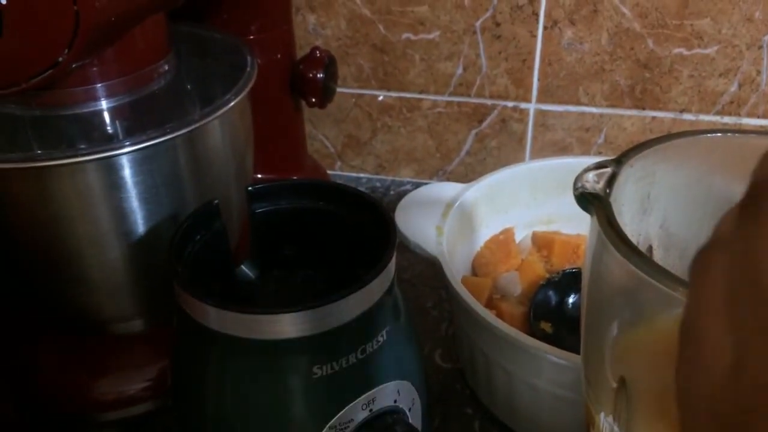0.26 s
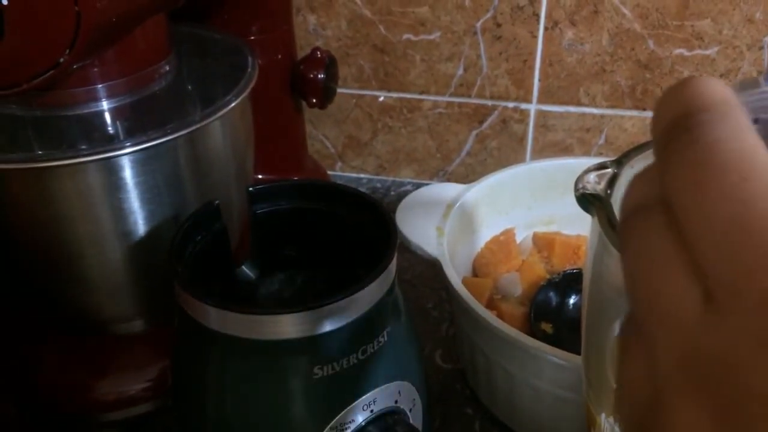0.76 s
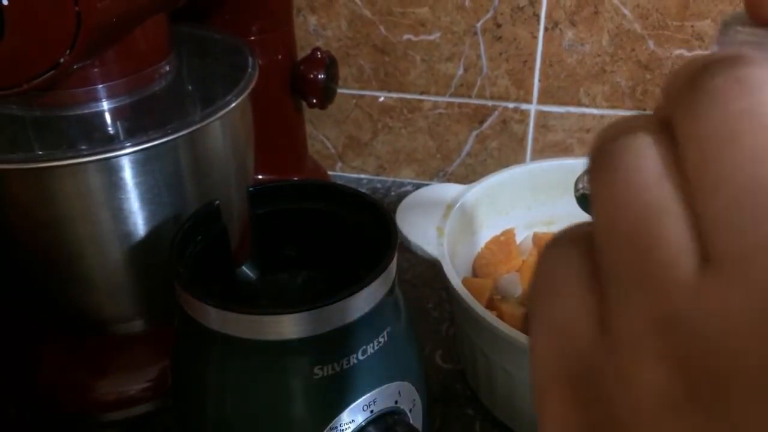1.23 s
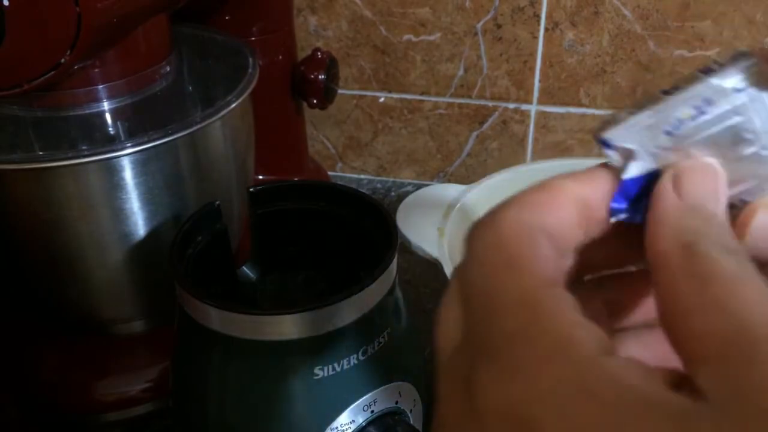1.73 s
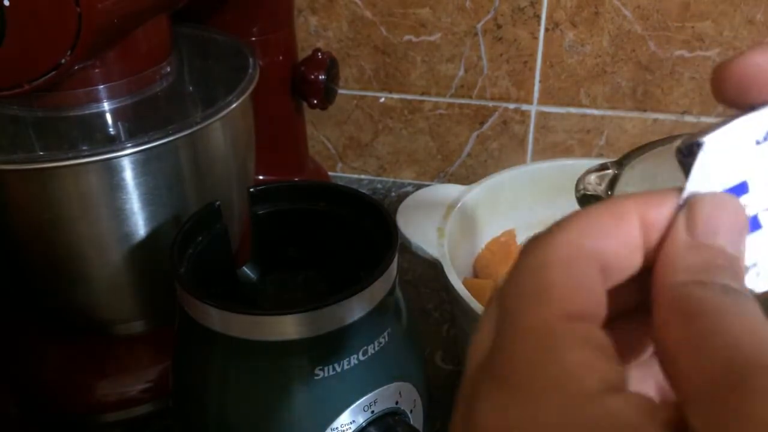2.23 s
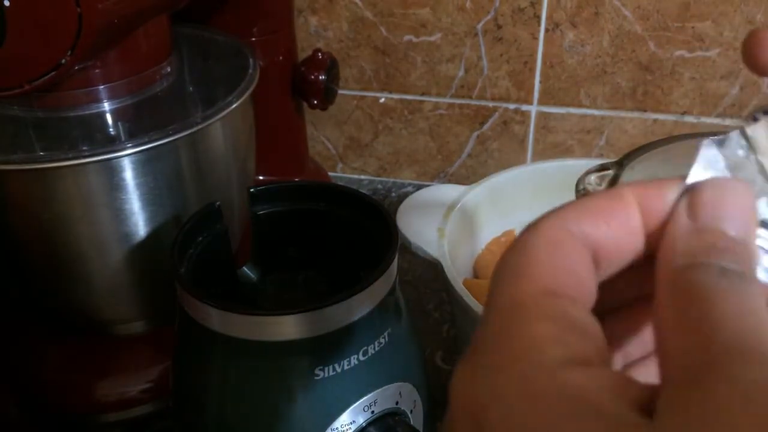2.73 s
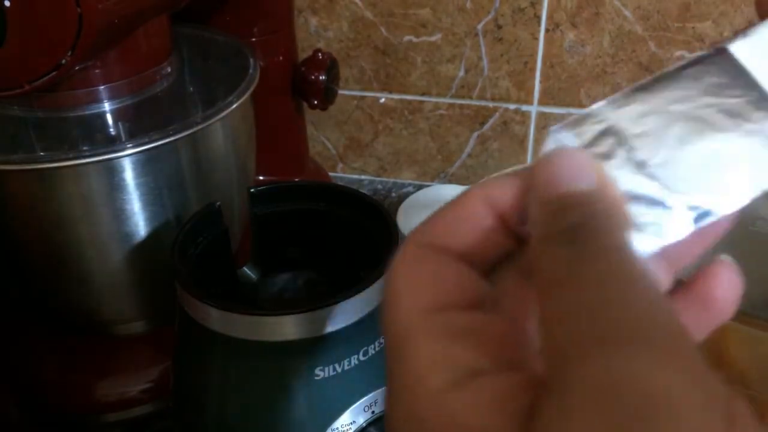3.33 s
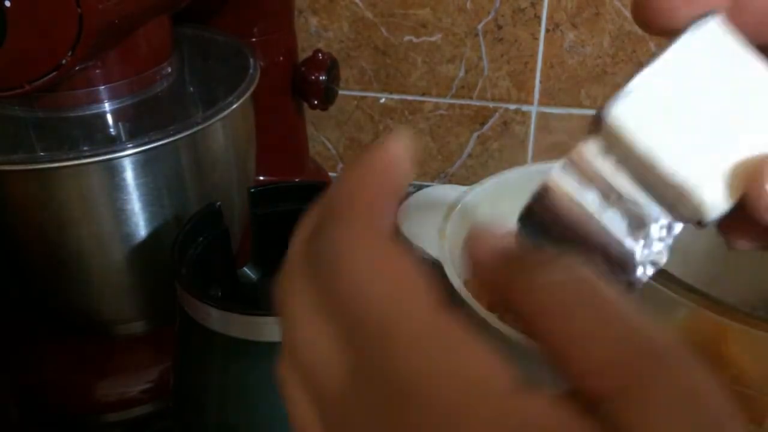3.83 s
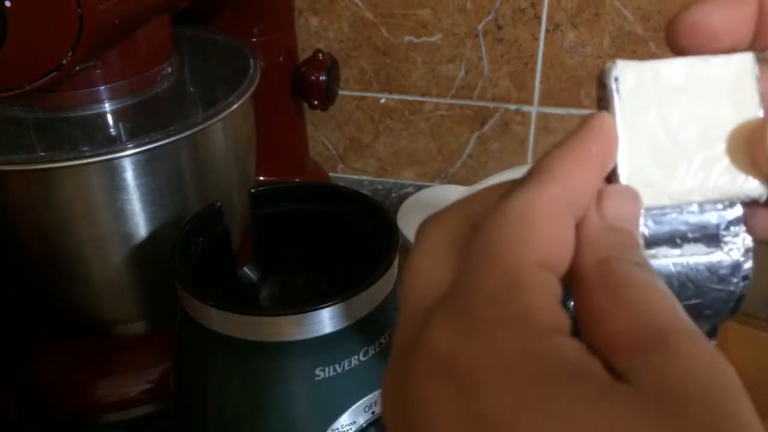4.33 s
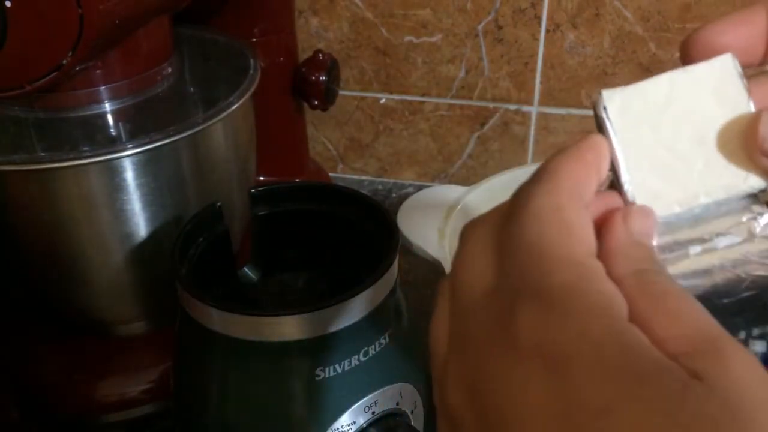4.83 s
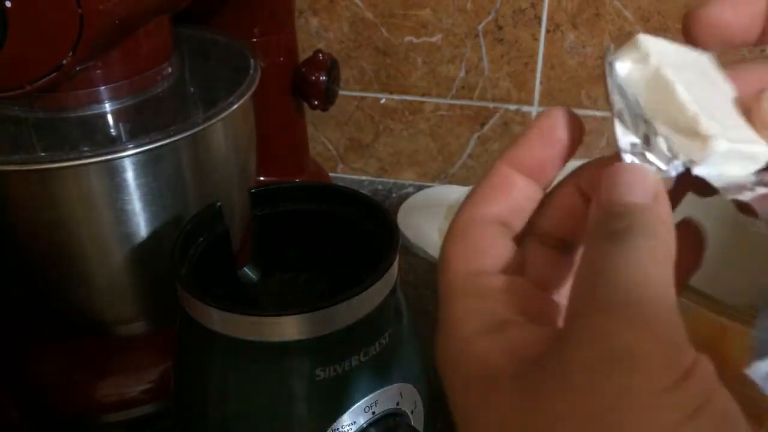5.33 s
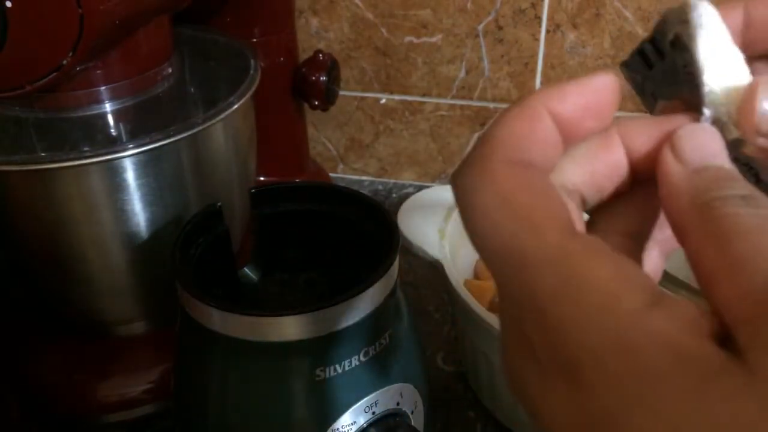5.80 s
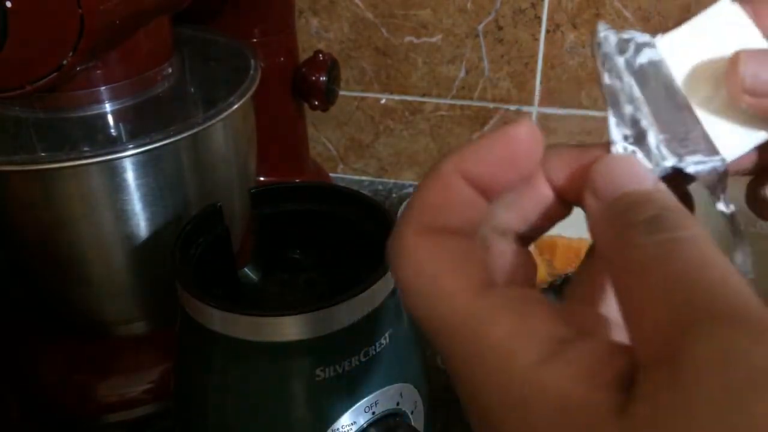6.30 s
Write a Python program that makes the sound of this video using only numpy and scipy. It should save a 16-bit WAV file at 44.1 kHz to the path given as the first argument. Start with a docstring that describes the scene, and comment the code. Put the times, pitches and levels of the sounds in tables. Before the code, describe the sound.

Close to the microphone, hands unwrap a small foil-covered block in a tiled kitchen. Faint isolated ticks come first, then a sudden loud, bright rip and dense crackling with a hollow, falling rustle as the sheet peels off. It calms to sparse snaps, a brief fingertip squeak and light crinkles of folding. Soft room noise continues beneath, with a low rumble swelling near the end.

```python
"""Hands unwrap a small foil-covered block over a kitchen counter, close to the microphone.
The foil ticks as it is gripped, then rips open and peels off with a falling hollow rustle.
A fingertip squeaks on it in short rubs, and the sheet is folded back.
Throughout, creases buckle with snaps that shake the sheet, small buckles crackle and dull thuds jolt the block.
Tiled walls answer with a short tail, over steady room noise and a low rumble that swells quickly near the end."""
import sys
import numpy as np
from scipy import signal
from scipy.fft import rfft, irfft, next_fast_len
from scipy.io import wavfile
from scipy.ndimage import map_coordinates

SR = 44100
rng = np.random.default_rng(int(sys.argv[2]) if len(sys.argv) > 2 else 0)


def wav_record(signal):
    """Record a signal, one row per channel, as 16-bit PCM in the file named by sys.argv[1]."""
    frames = np.transpose(np.atleast_2d(signal))
    bounded = np.clip(frames, -1, 1)
    # unit amplitude maps onto the largest positive 16-bit level
    quanta = np.round(bounded * 32767).astype(np.int16)
    wavfile.write(sys.argv[1], SR, quanta)


N = 289296


def amp(db):
    """Decibels to gain."""
    return 10 ** (np.asarray(db) / 20)


def unit(x):
    """Scale to rms 1."""
    return x / np.sqrt(np.mean(x ** 2) + 1e-20)


def along(points, hz):
    """Read a curve of (Hz, value) points on a log frequency axis."""
    f, v = np.transpose(points)
    return np.interp(np.log(hz + 1), np.log(f + 1), v)


def filtered(x, response):
    """Filter x with a response given as a function of frequency in Hz."""
    size = next_fast_len(2 * len(x))
    hz = np.fft.rfftfreq(size, 1 / SR)
    return irfft(rfft(x, size) * response(hz), size)[:len(x)]


def coloured(x, spectrum):
    """Shape x with the given spectrum in dB and scale it to rms 1."""
    return unit(filtered(x, lambda hz: amp(along(spectrum, hz))))


def resonance(hz, centre_hz, q):
    """Causal response of one damped mode, with gain 1 at its centre."""
    damping = 1j * hz * centre_hz / q
    return damping / (centre_hz ** 2 - hz ** 2 + damping)


def envelope(start_s, length_s, attack_s, release_db_per_s):
    """Rise linearly, hold until the length is over, then die away at a steady rate in dB."""
    t = np.arange(N) / SR - start_s
    rise = np.clip(t / attack_s, 0, 1)
    return rise * amp(-release_db_per_s * np.maximum(t - length_s, 0))


def snaps(snap_q=1.43, ring_q=0.41, ring_t60=0.038, ring_pitch=0.75, treble_hz=13000,
          stutter_db=1.0, stutter_per_s=700):
    """Each crease flips in one sharp pulse, then bending waves scatter through the sheet in uneven spurts."""
    # The clearest creases buckling. Each row: start in seconds, level of the pulse in dB with its energy
    # counted over one millisecond, pitch in Hz, ring of the sheet against the pulse in dB.
    creases = [(0.8316, -34.5, 8850, -9), (0.888, -56, 1700, 6.5), (1.017, -59, 3670, 7.5),
               (1.4237, -49, 5440, 7.5), (1.6746, -47, 1780, -3), (1.9445, -42, 7800, -0.5),
               (1.9647, -44.5, 8100, 0.5), (2.124, -49, 3570, 7.5), (2.255, -52.5, 6930, 3.5),
               (2.4327, -48.5, 7100, -1), (2.6897, -20.5, 4000, 6), (2.693, -21, 3250, -2),
               (2.7026, -19, 1860, -5), (2.7066, -19.5, 4700, -14), (2.7132, -20, 2570, -33),
               (2.7165, -13.5, 2450, -18), (2.725, -25, 2070, 4.5), (2.7352, -24.5, 4500, -14),
               (2.7591, -23, 3930, -17), (2.7882, -25.5, 1480, -19), (2.793, -34.5, 1580, -2),
               (2.7973, -31, 5300, -16), (2.931, -40.5, 5300, -9), (2.9416, -41, 1780, -0.5),
               (2.9573, -37.5, 1170, -9), (3.011, -36, 6340, 1), (3.0599, -36.5, 3600, -2.5),
               (3.0995, -26.5, 6070, -6), (3.1048, -30.5, 3000, 2), (3.1609, -33.5, 5600, -10),
               (3.1877, -39.5, 1700, 6.5), (3.2083, -32.5, 5940, -6), (3.2358, -31, 5840, -5),
               (3.2497, -20.5, 5540, -7.5), (3.2875, -26.5, 1990, 3.5), (3.2886, -21.5, 5800, -7),
               (3.2996, -28.5, 7140, 5), (3.321, -40, 5270, -9), (3.4349, -33, 5140, -9.5),
               (3.514, -26, 2670, -9), (3.5645, -33, 2530, 2), (3.586, -25.5, 2180, -5),
               (3.6067, -28, 2230, -2), (3.614, -30, 2480, -4), (3.6335, -37, 5270, -7),
               (3.679, -33.5, 2660, 4), (3.698, -28, 3980, 3.5), (3.8228, -32.5, 5560, -2),
               (3.8343, -24, 4300, 3), (3.8393, -23.5, 1760, 0.5), (3.8495, -24.5, 4370, -2),
               (3.866, -40, 2700, 8), (3.8786, -34, 3970, 0.5), (3.916, -48, 3600, 0),
               (3.9272, -31.5, 2770, 2.5), (3.9497, -35.5, 4900, 6.5), (3.9627, -41, 4060, -14),
               (4.019, -44, 3300, 5), (4.0327, -46, 4300, 5.5), (4.0425, -40, 3160, 5.5),
               (4.0684, -37.5, 5430, -1), (4.437, -51.5, 2490, -5), (4.7114, -43.5, 1400, -11),
               (4.9154, -51, 2050, 6.5), (5.1084, -45.5, 3330, -3), (5.2913, -39, 3540, -17),
               (5.2995, -46.5, 2980, 4), (5.3412, -48.5, 5500, -3), (5.4037, -45.5, 4340, -7),
               (5.4158, -43, 9000, -5), (5.4527, -42, 1980, 0), (5.527, -40, 6460, -4),
               (5.6103, -49, 4160, 4.5), (5.695, -53.5, 4560, 4.5), (5.947, -45.5, 7060, -0.5),
               (5.973, -50.5, 3320, 13), (5.9937, -35, 5300, -2.5), (6.0484, -40, 5450, 2.5),
               (6.0676, -36.5, 2350, -2), (6.094, -41, 4500, 2), (6.1035, -40, 7500, 7),
               (6.164, -33, 9300, -1), (6.1909, -37.5, 2070, -1), (6.204, -44.5, 4370, 3),
               (6.254, -52, 2100, 8.5), (6.4013, -49, 3500, 4.5), (6.507, -41.5, 4640, -10),
               (6.517, -48.5, 2440, 7.5)]
    out = np.zeros(N + SR)
    t = np.arange(SR // 16) / SR
    millisecond = SR / 1000  # in samples
    fade = amp(-60 * t / ring_t60) * (1 - np.exp(-t / 0.00042))
    impulse = 1.0 * (t == 0)
    for start_s, db, pitch_hz, sheet_db in creases:
        patch = facet(pitch_hz)
        pulse = filtered(radiated(impulse, pitch_hz, snap_q), patch)
        wander = map_coordinates(rng.standard_normal(len(t)), [t * stutter_per_s], order=1)
        scatter = rng.standard_normal(len(t)) * fade * amp(stutter_db * wander)
        ring = filtered(radiated(scatter, pitch_hz * ring_pitch, ring_q), patch)
        snap = unit(pulse) + amp(sheet_db) * unit(ring)
        first = round(start_s * SR)
        out[first:first + len(t)] += amp(db) * snap * np.sqrt(millisecond / len(t))
    soft_treble = lambda hz: 1 / np.sqrt(1 + (hz / treble_hz) ** 6)
    return filtered(out[:N], soft_treble)


def radiated(x, pitch_hz, q, low_hz=750, reach=2.16, crack=0.013):
    """A foil facet rings around its pitch, with little bass; a thin crack reaches into the high treble."""
    body = lambda hz: resonance(hz, pitch_hz, q) / (1 + 1j * hz / (reach * pitch_hz))
    # small, high-pitched facets crack more sharply
    edge = lambda hz: crack * pitch_hz / 4000 * 1j * hz / (pitch_hz + 1j * hz)
    bass_cut = lambda hz: 1j * hz / (low_hz + 1j * hz)
    return filtered(x, lambda hz: (body(hz) - edge(hz)) * bass_cut(hz))


def facet(pitch_hz, mode_q=7, mode_gain=1.13, spread=0.56, bend=0.13):
    """A new patch of foil: one mode on its pitch, three scattered ones, and bending waves, treble first."""
    modes_hz = pitch_hz * np.exp(spread * rng.uniform(-1, 1, size=3))
    signs = rng.choice([-1, 1], size=3)
    path = bend * rng.uniform(0.54, 1)  # a longer path spreads the treble and the lows further apart
    scattered = lambda hz: sum(sign * resonance(hz, centre, mode_q) for sign, centre in zip(signs, modes_hz))
    modes = lambda hz: 1 + mode_gain * (resonance(hz, pitch_hz, mode_q) + scattered(hz))
    return lambda hz: modes(hz) * np.exp(-1j * path * np.sqrt(hz))


def crackle(split_hz=3500, ring_t60=0.027, ring_db=2.5, busy_db=-38, busy_rate=1300, calm_rate=110):
    """Small buckles ring in the sheet; more strain gives more of them, and taut foil sounds brighter."""
    # The stretched sheet sings at a few resonances. Each row: centre in Hz, level in dB.
    sheet_modes = [(1950, 8.5), (2540, 4), (5790, -4)]
    sheet_q = 29
    # Overall colour of the crackling foil. Each row: frequency in Hz, relative level in dB per Hz.
    foil_spectrum = [(150, -23), (300, -20), (480, -1), (650, -7.5), (950, 3), (1900, -2.5), (2800, -5),
                     (4000, -6.5), (5900, -5), (10000, -15.5), (16000, -33)]
    db, bright_db = strain()
    rate = calm_rate + busy_rate * amp(db - busy_db) ** .7  # buckles per second
    buckles = grains(rate, spread_db=6.0)
    modes = lambda hz: 1 + sum(amp(level) * resonance(hz, centre, sheet_q) for centre, level in sheet_modes)
    ringing = buckles + amp(ring_db) * flexing(buckles, ring_t60)
    sheet = coloured(filtered(ringing, modes), foil_spectrum)
    body = filtered(sheet, lambda hz: 1 / (1 + (hz / split_hz) ** 4))
    treble = sheet - body
    # brightness tilts the sound: half of it lifts the treble, half lowers the body
    return amp(db) * (body * amp(-bright_db / 2) + treble * amp(bright_db / 2))


def strain():
    """Crackle level and brightness in dB: strokes add in power, and the strongest weighs most on the colour."""
    # Finger strokes that strain the foil: finding a grip, the rip, picking at the flap, peeling,
    # the block coming free, folding back.
    # Each row: start in seconds, length in seconds, level in dB before the tilt, brightness in dB.
    strokes = [(0.858, 0.044, -70.5, 30), (0.88, 0.37, -75, -6), (1.447, 0.085, -70, 24.5),
               (1.646, 0.024, -59, 11.5), (1.824, 0.015, -64.5, 17.5), (2.091, 0.022, -60, -3),
               (2.684, 0.019, -38, 23), (2.947, 0.32, -62, -9), (3.196, 0.037, -40, 5.5),
               (3.24, 0.018, -33.5, 15), (3.28, 0.033, -32.5, 7.5), (3.335, 0.041, -45.5, -18),
               (3.453, 0.11, -38, 1), (3.827, 0.016, -40.5, 0), (3.876, 0.23, -59, 2),
               (5.903, 0.44, -64.5, 2), (6.066, 0.086, -52.5, 9.5), (6.181, 0.02, -50, 3)]
    attack_share = 0.31  # long strokes swell slowly: the rise takes this share of the length
    release_db_per_s = 286
    power = np.array([(amp(db) * envelope(start_s, length_s, attack_share * length_s, release_db_per_s)) ** 2
                      for start_s, length_s, db, _ in strokes])
    total = power.sum(axis=0) + 1e-12
    brightness = np.array(strokes)[:, -1]
    return 10 * np.log10(total), brightness @ power / total


def grains(rate, spread_db):
    """Tiny buckles at random moments, of very uneven size; rate is per second, one value per sample."""
    size = amp(spread_db * np.clip(rng.standard_normal(N), -2, 2))
    happens = rng.random(N) < rate / SR
    sign = rng.choice([-1, 1], N)
    return unit(happens * sign * size / np.sqrt(rate))  # busier stretches get smaller buckles


def flexing(x, ring_t60, hold=.02, patch_hz=2400):
    """The sheet's ring; every hold seconds another patch takes it up, with resonances of its own."""
    step = round(hold * SR)
    t = np.arange(SR // 20) / SR
    out = np.zeros(N + SR)
    fade = amp(-60 * t / ring_t60)
    for start in range(0, N, step):
        patch = unit(filtered(rng.standard_normal(len(t)) * fade, facet(patch_hz, mode_gain=0.3)))
        ring = signal.fftconvolve(x[start:start + step], patch)
        out[start:start + len(ring)] += ring
    return unit(out[:N])


def peel(width_hz=55, upper_ratio=2.9, upper_db=0):
    """The freed sheet drums as it comes unstuck; its two low modes fall as it grows and slackens."""
    gain, pitch_hz = slackening()
    phase = 2 * np.pi * np.cumsum(pitch_hz) / SR

    def shake(width):
        """Slow noise that blurs a mode over its width in Hz."""
        return unit(filtered(rng.standard_normal(N), lambda hz: 1 / (1 + (hz / width) ** 2)))

    def mode(ratio):
        """A noisy band gliding at a fixed ratio to the sheet's pitch."""
        width = width_hz * ratio
        return shake(width) * np.cos(ratio * phase) + shake(width) * np.sin(ratio * phase)

    return gain * unit(mode(0.94) + amp(upper_db) * mode(upper_ratio))


def slackening():
    """Gain and pitch of the freed sheet: each peel starts taut and sags until the pull ends."""
    # The sheet coming unstuck from the block. Each row: start in seconds, length in seconds, level in dB,
    # reference pitch at the start in Hz (the modes sound at ratios to it).
    pulls = [(3.245, 0.06, -52.5, 460), (3.366, 0.06, -51.5, 270), (3.508, 0.09, -50.5, 300),
             (3.814, 0.03, -51.5, 160)]
    attack_s, release_db_per_s, sag_octaves_per_s = 0.0027, 252, 8.3
    t = np.arange(N) / SR
    gain, pitch_hz = np.zeros(N), np.zeros(N)
    for start_s, length_s, db, start_hz in pulls:
        gain += amp(db) * envelope(start_s, length_s, attack_s, release_db_per_s)
        sagging_hz = start_hz * 2 ** (-sag_octaves_per_s * np.clip(t - start_s, 0, length_s))
        pitch_hz = np.where(t < start_s, pitch_hz, sagging_hz)
    return gain, pitch_hz


def thuds():
    """A soft fingertip stops the block: a short low shudder of noise with no ring."""
    # The fingers jolt the block. Each row: start in seconds, level in dB.
    jolts = [(1.6716, -50), (2.122, -53), (2.704, -52), (3.836, -48), (6.4002, -49)]
    corner_hz, t60_s, attack_s = 960, 0.074, 0.0019
    dull = lambda hz: hz / (hz + 100) / (1 + (hz / corner_hz) ** 2)
    shudder = unit(filtered(rng.standard_normal(N), dull))
    return shudder * sum(amp(db) * envelope(start_s, 0, attack_s, 60 / t60_s) for start_s, db in jolts)


def rubs():
    """Rough friction drives the same few modes; each slip has its own brightness, which tilts their balance."""
    # A fingertip slips on the foil in short squeaks.
    # Each row: start in seconds, level in dB, brightness in dB per octave.
    slips = [(5.176, -46.5, -7), (5.185, -55, 3), (5.199, -49.5, 6), (5.231, -53, 3)]
    # Modes that the friction drives. Each row: centre in Hz, level in dB before the brightness.
    slip_modes = [(1550, 4), (2713, -3), (3050, -9)]
    q, attack_s, length_s, release_db_per_s = 4.9, 0.0017, 0.0036, 1200
    out = np.zeros(N)
    for start_s, db, bright_db in slips:
        tilted = lambda centre, level: amp(level + bright_db * np.log2(centre / 1000))
        modes = lambda hz: sum(tilted(centre, level) * abs(resonance(hz, centre, q)) ** 2
                               for centre, level in slip_modes)
        scrape = unit(filtered(rng.standard_normal(N), modes))
        out += amp(db) * scrape * envelope(start_s, length_s, attack_s, release_db_per_s)
    return out


def kitchen(x, delay=.004):
    """Tiles and bowls return a short diffuse tail: noise whose treble dies sooner than its lows."""
    # Decay of the room. Each row: frequency in Hz, time to fall by 60 dB in seconds.
    decay = [(200, 0.95), (1200, 0.45), (6000, 0.35), (15000, 0.16)]
    hz, t, z = signal.stft(rng.standard_normal(SR // 2), SR, nperseg=256)
    fade = amp(-60 * t / along(decay, hz)[:, None])
    tail = signal.istft(z * fade, SR, nperseg=256)[1]
    delayed = np.pad(x, (round(delay * SR), 0))
    return signal.fftconvolve(delayed, tail / np.linalg.norm(tail))[:N]


def background(air_db=-61.5):
    """Steady room noise over a low rumble that swells quickly near the end, both made of coloured noise."""
    # Colour of the room noise. Each row: frequency in Hz, relative level in dB per Hz.
    air_spectrum = [(59, -37), (100, -7.5), (350, -8), (471, -10), (891, -15), (1200, -15), (8280, -29),
                    (16000, -38.5)]
    # Colour of the rumble. Each row: frequency in Hz, relative level in dB per Hz.
    rumble_spectrum = [(25, -31), (50, -7), (82, 4.5), (110, -2), (200, -45), (600, -82)]
    # Course of the low rumble, which swells with the handling near the end.
    # Each row: time in seconds, level in dB.
    rumble_course = [(0, -64.5), (1.7, -71.5), (5.9, -68), (6.1, -58), (6.56, -63.5)]
    air = amp(air_db) * coloured(rng.standard_normal(N), air_spectrum)
    times, levels = np.transpose(rumble_course)
    rumble_db = np.interp(np.arange(N) / SR, times, levels)
    return air + amp(rumble_db) * coloured(rng.standard_normal(N), rumble_spectrum)


def scene(room_db=-13.5):
    """The wrapper close by, the kitchen around it."""
    room_noise = background()
    foil = snaps() + crackle() + peel() + thuds() + rubs()
    return (foil + amp(room_db) * kitchen(foil) + room_noise)[None]


def record(dry, top_hz=16300):
    """The recorder keeps nothing above its band limit."""
    return np.array([filtered(channel, lambda hz: hz < top_hz) for channel in dry])


dry = scene()
out = record(dry)
wav_record(out)
```